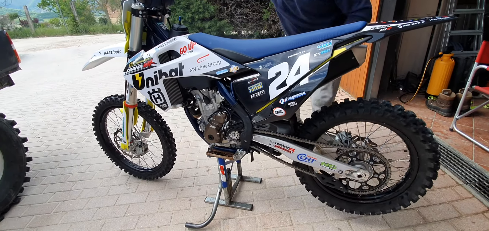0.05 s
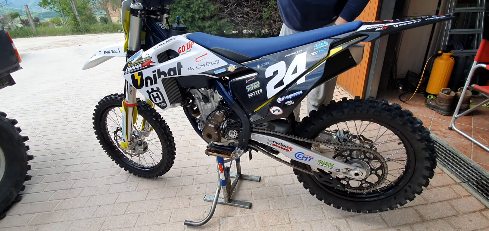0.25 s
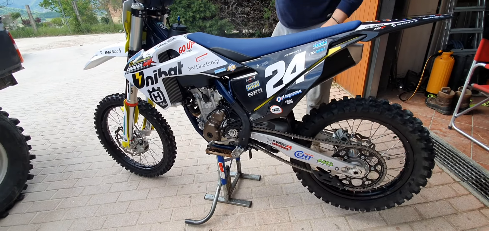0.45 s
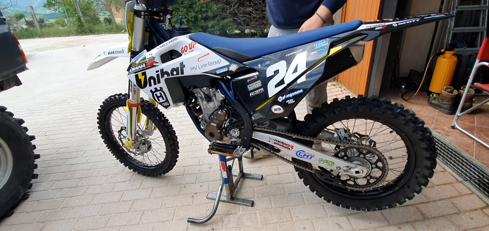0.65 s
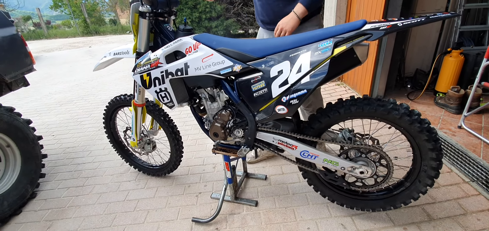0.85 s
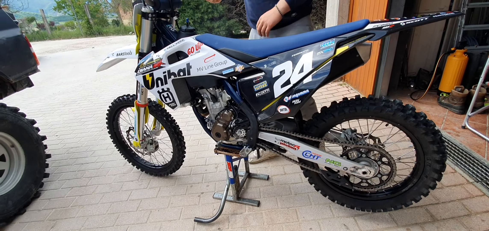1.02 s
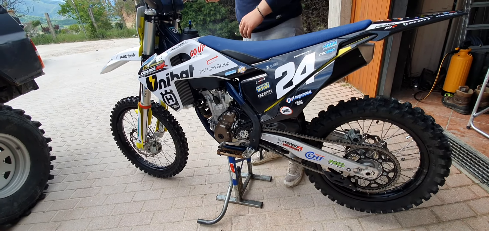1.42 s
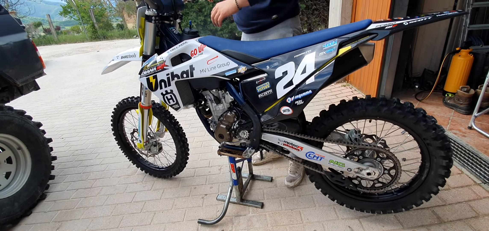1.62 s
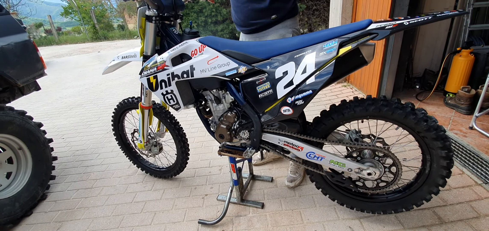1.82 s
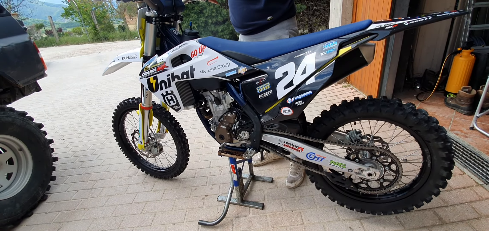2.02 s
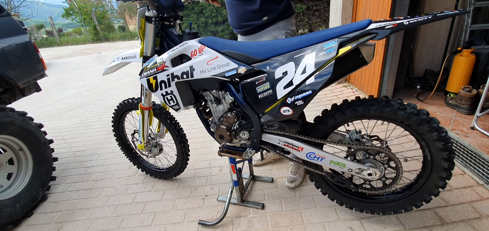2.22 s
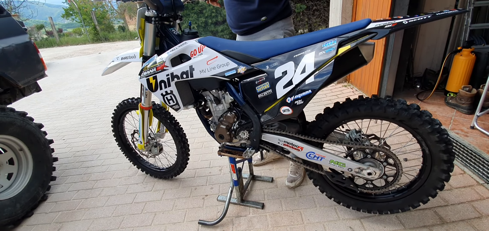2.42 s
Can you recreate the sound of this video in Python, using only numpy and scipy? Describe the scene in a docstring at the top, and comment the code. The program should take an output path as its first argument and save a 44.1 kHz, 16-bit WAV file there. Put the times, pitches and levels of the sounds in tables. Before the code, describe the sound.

A dirt bike engine idles close by with a low clatter. At about 0.2 seconds it revs sharply with a loud, raspy bark, peaking with an exhaust pop near 0.5 seconds, then winding down. A second rev starts around 1.25 seconds and pops near 1.5. The engine then sinks with a soft throb and mechanical rattle to idle by 2.5 seconds. The yard adds a brief echo.

```python
"""A low, clattering idle is heard first: a single-cylinder four-stroke motocross bike on its stand.
The throttle is blipped twice. While it is open, each firing sends a pressure pulse down the pipe,
which resonates and barks, and the escaping gas rasps. As it shuts the exhaust pops, and the engine
coasts down with a soft throb under the impacts of valves and gears. Yard and garage echo briefly."""
import sys
import numpy as np
from scipy import signal
from scipy.fft import rfft, irfft
from scipy.io import wavfile
from scipy.ndimage import uniform_filter1d

SR = 44100
rng = np.random.default_rng(int(sys.argv[2]) if len(sys.argv) > 2 else 0)


def wav_record(signal):
    """Record a signal, one row per channel, as 16-bit PCM in the file named by sys.argv[1]."""
    frames = np.transpose(np.atleast_2d(signal))
    bounded = np.clip(frames, -1, 1)
    # unit amplitude maps onto the largest positive 16-bit level
    quanta = np.round(bounded * 32767).astype(np.int16)
    wavfile.write(sys.argv[1], SR, quanta)


N = 112454
T = np.arange(N) / SR
IDLE_HZ, MID_SPEED_HZ = 28, 50  # reference firing rates

# reverberation time of the yard (f/Hz, T60/s)
YARD_DECAY = [(100, 0.57), (1000, 0), (4000, 0.9), (12000, 1.6)]
# spectrum of its echo (f/Hz, level/dB)
YARD_SPECTRUM = [(100, -13.5), (300, -3.5), (12000, -6)]
# ragged low rumble (f/Hz, level/dB)
RUMBLE_SPECTRUM = [(20, -14), (50, -0.5), (75, 2.5), (115, 0.5), (160, -4.5), (320, -14), (500, -31),
                   (4000, -78)]
# modes of the engine cases (f/Hz, bandwidth/Hz, level/dB)
CASE_MODES = [(1044, 116, -49.5), (2507, 57, -53.5), (3070, 59, -57), (3527, 45, -49.5)]
# gear tones (multiple of the firing rate, level/dB relative to the clatter)
GEAR_ORDERS = [(10, -16), (12, -18), (16, -17), (22, -16.5), (48, -13)]
# growth of clatter with speed (firing rate/Hz, level/dB)
CLATTER_BY_SPEED = [(26, -43.5), (56, -33.5), (75, -27), (92, -23), (110, -23)]
# valve impacts (phase/cycles, relative strength)
VALVE_KNOCKS = [(.08, 1), (.31, 0.77), (.55, 0.53), (0.782, 0.63)]
# valve and gear clatter (f/Hz, level/dB)
CLATTER_SPECTRUM = [(60, -21.5), (300, -1.5), (600, -2.5), (850, -3.5), (1080, 4), (1350, -6.5), (1850, 0),
                    (2600, -4.5), (3550, 1), (4600, -2), (5500, -14.5), (6900, -16), (7600, -29),
                    (10500, -27.5), (16000, -35)]
# its added brightness at high speed (f/Hz, level/dB)
SIZZLE_SPECTRUM = [(2000, -39), (5500, 1), (10000, 1), (16000, -4)]
# engine speed (t/s, firing rate/Hz)
FIRING_RATE = [(0, 27.5), (.2, 25.1), (.25, 35.5), (.33, 57.2), (.41, 90.6), (.47, 110.9), (.53, 105.1),
               (.65, 89.3), (.8, 72.7), (1, 54.1), (1.15, 40.7), (1.24, 40.8), (1.29, 53), (1.37, 88),
               (1.44, 113), (1.51, 109), (1.64, 91.4), (1.8, 73.3), (2.05, 50.2), (2.2, 40.9), (2.36, 30.8),
               (2.55, 25)]
# throttle blips (opening t/s, rise time/s, shutting t/s, bark level/dB)
THROTTLE_BLIPS = [(0.197, 0.057, 0.46, 0.5), (1.226, 0.054, 1.428, 1)]
# strength of the throb (t/s, level/dB)
THROB_ENVELOPE = [(0, -28.5), (.18, -37.5), (.21, -18), (.25, -13), (.44, -12.5), (.5, -13.5), (.58, -21.5),
                  (1.05, -25.5), (1.13, -26), (1.22, -29.5), (1.25, -17), (1.28, -11.5), (1.42, -12.5),
                  (1.5, -13.5), (1.59, -21.5), (1.77, -23.5), (2.05, -26), (2.2, -28.5), (2.235, -24),
                  (2.36, -30), (2.55, -49)]
# response of the intake (f/Hz, level/dB)
AIRBOX_RESPONSE = [(25, -53.5), (60, -7), (115, 1.5), (160, -8), (215, 2), (280, -0.5), (340, -7.5),
                   (450, -22.5), (900, -47.5)]
# travel time through pipe and silencer (f/Hz, delay/s)
PIPE_GROUP_DELAY = [(150, 0.00055), (270, 0.0031), (750, 0.00029), (1250, 0.00299), (2000, .0053)]
# harmonics of a coasting puff (multiple of the firing rate, level/dB)
PUFF_HARMONICS = [(1, -5), (2, 0.5), (3, -0.5), (4, 3.5), (6, -3.5), (12, -19.5), (20, -30)]
# fluttering gas flow (f/Hz, level/dB)
FLUTTER_SPECTRUM = [(40, -36.5), (220, 2), (320, 2), (430, -11.5), (700, -19), (4000, -71)]
# pipe response, throttle shut (f/Hz, level/dB)
PIPE_COASTING = [(25, -53), (48, -10), (75, 1), (110, -0.5), (155, -8), (210, -2.5), (260, -2.5),
                 (315, -0.5), (390, -11.5), (450, -18.5), (520, -5), (640, -19.5), (1100, -17), (2000, -47),
                 (5000, -80)]
# pipe response, throttle open (f/Hz, level/dB)
PIPE_LOADED = [(25, -42), (55, -8), (105, -4.5), (150, -11), (220, 0.5), (315, 1), (410, -13), (510, -5),
               (620, -12), (800, -18.5), (1200, -24), (2500, -46.5), (6000, -77)]
# pipe resonances under load (f/Hz, bandwidth/Hz, level/dB)
PIPE_MODES = [(207, 27, -12.5), (320, 32, -16.5), (498, 30, -20.5), (648, 17, -11.5)]
# exhaust pops as the throttle shuts (t/s, relative level/dB)
EXHAUST_POPS = [(0.4909, -2), (1.4811, -0.5), (1.4904, 0.5)]
# gas rasp of a loaded firing (f/Hz, level/dB)
RASP_SPECTRUM = [(100, -15), (400, -0.5), (750, -1), (1150, 4), (1500, -2), (1950, 1), (3000, -4.5),
                 (4600, 2.5), (5400, -9), (6300, -18), (7800, -22.5), (10500, -20), (16000, -30)]
# sharp crack of a loaded firing (f/Hz, level/dB)
BARK_SPECTRUM = [(150, -40), (450, -10), (680, 6), (820, -2.5), (1100, 0.5), (1300, -3), (1550, -19),
                 (1950, -2.5), (2200, -15.5), (3200, -20.5), (4500, -14.5), (6000, -34.5), (15000, -45)]
# gain of the difference between the two microphones (f/Hz, level/dB)
STEREO_WIDTH = [(100, -8.5), (550, -3), (2000, 1)]
# their balance, left minus right (f/Hz, level/dB)
STEREO_TILT = [(200, -0.5), (1290, -1.5), (2380, -2), (4400, -12.5), (6000, 4.5), (8100, 11), (11000, -3.5),
               (15000, 5)]
# their loss of the deepest bass (f/Hz, level/dB)
BASS_ROLLOFF = [(8, -52), (25, -15), (45, 0)]


def amp(db):
    """Amplitude ratio of a level in decibels."""
    return 10 ** (np.asarray(db) / 20)


def unit(x):
    """Normalisation to unit rms."""
    return x / np.sqrt(np.mean(x ** 2) + 1e-20)


def curve(points, at):
    """Linear interpolation between points."""
    return np.interp(at, *np.transpose(points))


def spectrum(points, hz):
    """Interpolation on a logarithmic axis, log(hz + 1)."""
    f, value = np.transpose(points)
    return np.interp(np.log(hz + 1), np.log(f), value)


def convolve(x, response):
    """Linear filtering by an impulse response, cut to the scene's length."""
    x, response = (np.atleast_2d(a).astype(np.float32) for a in (x, response))
    return signal.oaconvolve(x, response, axes=1)[:, :N]


def colour(x, points, size=8192):
    """Minimum-phase filtering at unit energy: the table sets only the spectral shape."""
    log_gain = np.log(amp(spectrum(points, abs(np.fft.fftfreq(size, 1 / SR)))))
    response = np.fft.ifft(np.exp(np.conj(signal.hilbert(log_gain)))).real[:size // 2]
    return convolve(x, response / np.linalg.norm(response))


def ring(hz, width_hz, size=8000):
    """Impulse response of a damped resonator, at unit energy."""
    tone = np.exp(-np.pi * width_hz * T[:size]) * np.sin(2 * np.pi * hz * T[:size])
    return tone / np.linalg.norm(tone)


def impulses(cycles, place):
    """Impulse train: one click a cycle at the given phase, split between neighbouring samples."""
    phase = cycles - place
    at = np.flatnonzero(np.diff(np.floor(phase)) > 0)
    early = (phase[at + 1] % 1) / (phase[at + 1] - phase[at])
    out = np.zeros(N)
    out[at], out[at + 1] = early, 1 - early
    return out


def per_cycle(cycles, count=400):
    """Cycle-to-cycle variation: a Gaussian value held through each cycle."""
    return rng.standard_normal(count)[np.floor(cycles + .1).astype(int) % count]


def yard_echo(x, gap_s=.006):
    """Diffuse reflection from paving and garage front, decaying exponentially in each band."""
    reflections = rng.standard_normal((2, SR // 2)) * (T[:SR // 2] > gap_s)
    hz, t, bands = signal.stft(reflections, SR, nperseg=256)
    decay_rate = np.log(1000) / spectrum(YARD_DECAY, hz)[:, None]
    fade = np.exp(-decay_rate * t) * np.sqrt(2 * decay_rate / SR)
    gain = amp(spectrum(YARD_SPECTRUM, hz))[:, None]
    return convolve(x, signal.istft(bands * fade * gain, SR)[1])


def add_wall_reflection(x, delays_s=(.0036, .0039), gain=.9):
    """Comb filtering: sound interferes with its reflection from a nearby wall."""
    reflected = np.array([np.interp(T - s, T, side, left=0) for side, s in zip(x, delays_s)])
    return (x + gain * reflected) / np.hypot(1, gain)


def rumble(speed):
    """Low-frequency noise that weakens as a power of the engine speed."""
    return amp(-32.5) * colour(rng.standard_normal(N), RUMBLE_SPECTRUM) * (IDLE_HZ / speed) ** 1.27


def case_ringing(speed, shared=.8):
    """Forced vibration: the engine cases ring at fixed modes, more as the speed rises."""
    drive = rng.standard_normal((2, N)) + shared * rng.standard_normal(N)
    modes = sum(amp(db) * unit(convolve(drive, ring(hz, width))) for hz, width, db in CASE_MODES)
    return modes * (speed / IDLE_HZ) ** .77


def gear_whine(speed, cycles, waver_depth=.5, count=90):
    """Periodic tooth contact gives tones at multiples of the firing rate, wavering in strength."""
    knots, out = np.linspace(0, T[-1], count), np.zeros((2, N))
    for order, db in GEAR_ORDERS:
        for side in out:
            waver = np.interp(T, knots, 1 + waver_depth * rng.standard_normal(count))
            side += amp(db) * waver * np.cos(2 * np.pi * (order * cycles + rng.random()))
    return out * amp(curve(CLATTER_BY_SPEED, speed))


def gear_mesh(speed, cycles, shared, harmonics=180, size=4096):
    """Periodic roughness: the same uneven teeth pass each cycle, so overtones glide with the speed."""
    teeth = rng.standard_normal((2, size)) + shared * rng.standard_normal(size)
    teeth = unit(irfft(rfft(teeth)[:, :harmonics], size))
    rolled = np.array([np.interp(cycles % 1, np.arange(size) / size, side) for side in teeth])
    return rolled * np.sqrt(2 * harmonics * speed / SR)


def grit(shared, grains_per_s=2800, spread_db=2.5):
    """Shot noise: chain and gears make tiny impacts at random times."""
    sizes = amp(spread_db * np.minimum(rng.exponential(1, N), 4))
    grains = sizes * (rng.random(N) < grains_per_s / SR)
    return unit(grains * (rng.standard_normal((2, N)) + shared * rng.standard_normal(N)))


def valve_knocks(speed, cycles, shared, decay_s=.008, scatter=.47, size=1500):
    """Impact excitation: valves strike at fixed phases, each blow a damped burst of noise."""
    knocks = 0
    for place, strength in VALVE_KNOCKS:
        noise = rng.standard_normal((2, size)) + shared * rng.standard_normal(size)
        blows = impulses(cycles, place) * strength * (1 + scatter * per_cycle(cycles - place))
        knocks = knocks + convolve(blows, noise * np.exp(-T[:size] / decay_s))
    return unit(knocks / np.sqrt(speed))


def clatter(speed, cycles, shared=.58):
    """Incoherent sources add in power: with speed, knocks and grit give way to a rush of gears."""
    knocks, grains = valve_knocks(speed, cycles, shared), grit(shared)
    rolling = np.minimum(.69 * np.sqrt(speed / MID_SPEED_HZ), .75)
    rush = rolling * gear_mesh(speed, cycles, shared) + np.sqrt(1 - rolling ** 2) * grains
    knocking = np.minimum(.45 * IDLE_HZ / speed, 1)
    drive = knocking * knocks + np.sqrt(1 - knocking ** 2) * rush
    drive *= amp(curve(CLATTER_BY_SPEED, speed))
    sizzle = colour(drive[::-1] * (speed / speed.max()) ** 2, SIZZLE_SPECTRUM)  # sides swapped
    return colour(drive, CLATTER_SPECTRUM) + amp(-16.5) * sizzle


def throttle(shut_s=.04):
    """Linear rise and exponential fall of the opening (0-1); the load follows its square."""
    opening = load = 0
    for opens, rise, shuts, db in THROTTLE_BLIPS:
        blip = np.clip((T - opens) / rise, 0, 1) * np.exp(-np.maximum(T - shuts, 0) / shut_s)
        opening = opening + blip
        load = load + blip ** 2 * amp(db)
    return np.minimum(opening, 1), load


def disperse(x, size=4096):
    """Dispersion: pipe and silencer delay each frequency differently, turning a click into a chirp."""
    delay = spectrum(PIPE_GROUP_DELAY, np.fft.rfftfreq(size, 1 / SR))
    return convolve(x, irfft(np.exp(-2j * np.pi * np.cumsum(delay) * SR / size))[:size // 2])


def airbox(speed, firing, coasting_kick, loaded_kick):
    """Cavity resonance: suction once a cycle makes the airbox boom when coasting and gulp under load."""
    suction = impulses(firing, .13) * coasting_kick * (IDLE_HZ / speed) ** .98
    boom = convolve(suction, ring(hz=114, width_hz=14))
    gulp = colour(impulses(firing, .511) * loaded_kick, AIRBOX_RESPONSE)
    return amp(-5.5) * gulp - amp(-3) * boom


def coasting_puffs(firing, flow, lag_cycles=.0072):
    """Source and filter: the pipe shapes soft puffs built from harmonics of the firing rate."""
    phase = np.linspace(0, 1, 512)
    shape = sum(amp(spectrum(PUFF_HARMONICS, k - 1)) * np.cos(2 * np.pi * k * phase)
                for k in range(1, 17))
    puffs = np.interp((firing - lag_cycles) % 1, phase, shape)
    power = uniform_filter1d(colour(puffs, PIPE_COASTING)[0] ** 2, size=6000)
    return colour(flow * puffs / np.sqrt(abs(power) + 1e-12), PIPE_COASTING)


def loaded_pulses(firing, kick):
    """Air-column resonance: hard exhaust pulses ring the modes of the pipe."""
    pulses = impulses(firing, 0) * kick
    modes = sum(amp(db) * ring(hz, width) for hz, width, db in PIPE_MODES)
    return colour(pulses, PIPE_LOADED) + convolve(pulses, modes)


def throb(speed, firing, opening, flutter_gain=.39):
    """Pulsating flow radiates from exhaust and intake, most unevenly at idle; the gas flutters."""
    spread_db = .35 + (IDLE_HZ / speed) ** 2
    uneven_db = spread_db * uniform_filter1d(per_cycle(firing), size=200)
    strength = amp(curve(THROB_ENVELOPE, T) + uneven_db)
    flow = strength * np.minimum(speed / MID_SPEED_HZ, 1) ** 1.53
    flutter = flutter_gain * colour(flow * rng.standard_normal(N), FLUTTER_SPECTRUM)
    kick = np.sqrt(SR / speed) * strength  # keeps pulse power independent of the rate
    loaded_kick = amp(-4) * kick * opening
    exhaust = coasting_puffs(firing, flow * (1 - opening)) + loaded_pulses(firing, loaded_kick)
    return disperse(exhaust) + flutter + airbox(speed, firing, kick * (1 - opening), loaded_kick)


def rasp(speed, firing, strength, decay_cycles=.195, pop_decay_s=.0044):
    """Modulated flow noise: escaping gas hisses in a burst at each loaded firing and each pop."""
    bursts = unit(.23 + np.exp(-(firing % 1) / decay_cycles))
    gas = amp(-17.5) * bursts * strength * (speed / speed.max()) ** .8
    for at, db in EXHAUST_POPS:
        gas += amp(db - 10) * (T >= at) * np.exp(-np.maximum(T - at, 0) / pop_decay_s)
    return colour(uniform_filter1d(gas, size=60) * rng.standard_normal((2, N)), RASP_SPECTRUM)


def bark(speed, firing, load, spread_db=1.05):
    """Impulsive radiation: loaded firings and pops crack from the pipe, along with their rasp."""
    strength = load / amp(spread_db * per_cycle(firing))
    kick = np.sqrt(SR / speed) * strength * (speed / MID_SPEED_HZ) ** .23
    cracks = impulses(firing, 0) * kick
    for at, db in EXHAUST_POPS:
        cracks[round(at * SR)] += amp(db) * np.sqrt(SR / speed.max())
    hiss = add_wall_reflection(rasp(speed, firing, strength))
    return amp(-20) * disperse(colour(cracks, BARK_SPECTRUM)) + hiss


def scene():
    """Superposition of engine and exhaust noise, governed by one speed and one throttle."""
    speed = curve(FIRING_RATE, T)
    cycles = .48 + np.cumsum(speed) / SR
    opening, load = throttle()
    jitter_cycles = .041 * (speed / speed.max()) ** 3  # firings scatter in time at high speed
    firing = cycles + jitter_cycles * uniform_filter1d(per_cycle(cycles + .5), size=200)
    bike = rumble(speed) + throb(speed, firing, opening) + bark(speed, firing, load)
    bike += clatter(speed, cycles) + gear_whine(speed, cycles) + case_ringing(speed)
    return bike + yard_echo(bike)


def record(dry, cutoff_hz=16000):
    """Stereo pickup: close microphones share the bass and differ in treble; clipping, then low-pass."""
    hz, both = np.fft.rfftfreq(N, 1 / SR), rfft(dry)
    mid = both.mean(0)
    both = mid + (both - mid) * amp(spectrum(STEREO_WIDTH, hz))
    tilt_db = spectrum(STEREO_TILT, hz)
    balance = amp(np.array([tilt_db, -tilt_db]) / 2)
    balance /= np.sqrt((balance ** 2).mean(0))
    clipped = np.clip(irfft(both * amp(spectrum(BASS_ROLLOFF, hz)) * balance, N), -1, 1)
    low_pass = signal.firwin(511, cutoff_hz, window=("kaiser", 9), fs=SR)
    return signal.oaconvolve(clipped, low_pass[None], "same")


dry = scene()
out = record(dry)
wav_record(out)
```